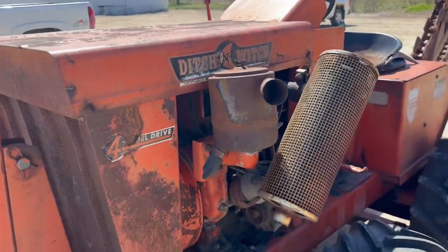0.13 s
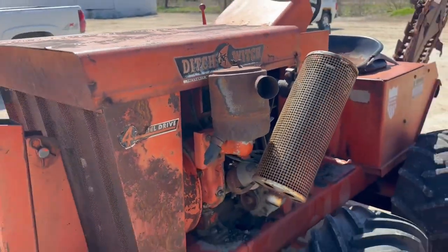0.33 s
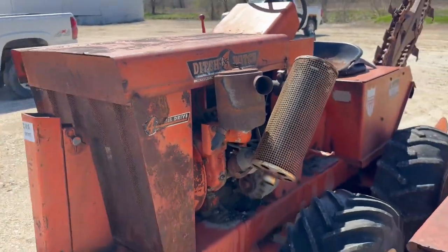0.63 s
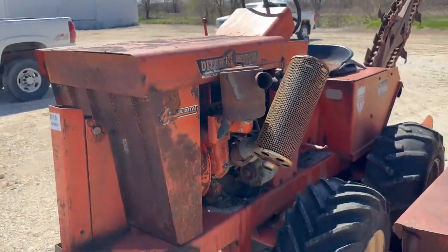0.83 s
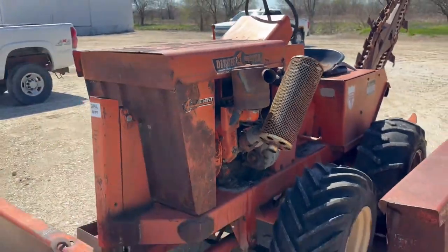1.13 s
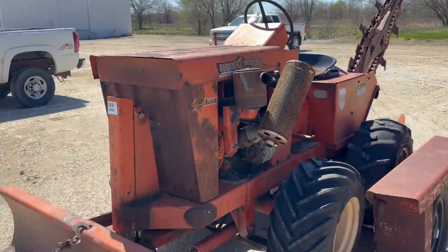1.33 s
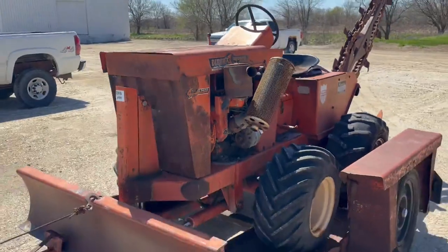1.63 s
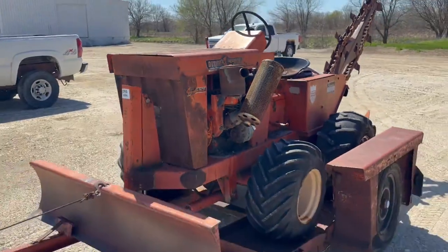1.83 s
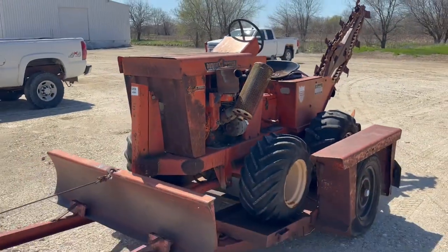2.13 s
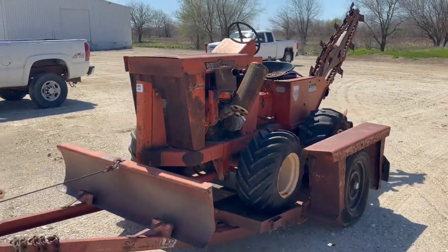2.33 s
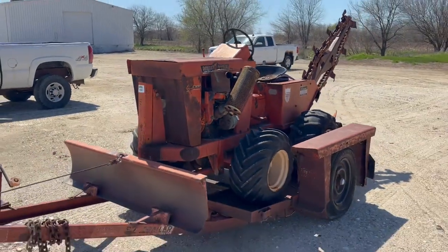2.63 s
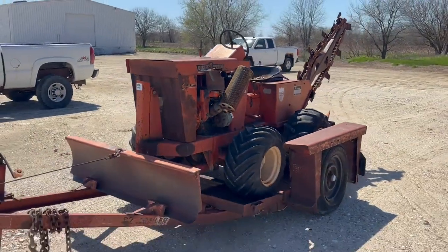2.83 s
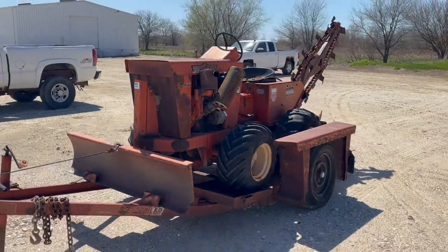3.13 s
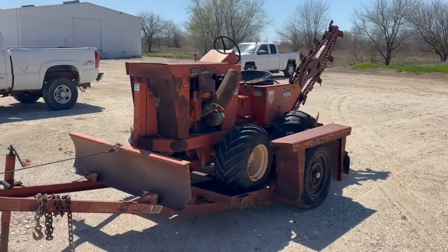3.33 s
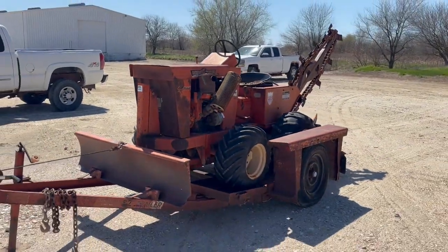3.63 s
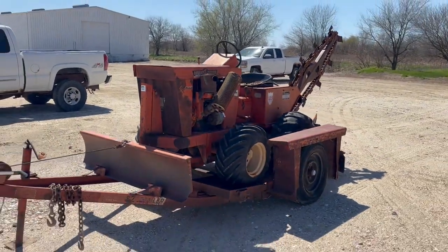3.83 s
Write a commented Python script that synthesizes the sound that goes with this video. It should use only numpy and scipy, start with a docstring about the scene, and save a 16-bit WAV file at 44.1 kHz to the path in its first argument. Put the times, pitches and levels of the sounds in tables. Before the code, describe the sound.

Small petrol engine chugging at fast even idle in an open gravel lot, gradually growing more distant

```python
"""The two-cylinder petrol engine of a trencher idles in an open gravel lot while the microphone backs away.
Each engine cycle fires two exhaust beats a quarter cycle apart, which boom and ring the muffler.
Knocks ring the block and sheet metal, the valve gear ticks, steady tones waver and the cooling fan rushes.
Filtered noise makes the air rumble, the low wind gusts and the later scuffs; decaying sines make dull bumps.
The bass falls away near the end."""
import sys
import numpy as np
from scipy import signal
from scipy.fft import rfft, irfft
from scipy.io import wavfile
from scipy.ndimage import map_coordinates

SR = 44100
rng = np.random.default_rng(int(sys.argv[2]) if len(sys.argv) > 2 else 0)


def wrap_up_sound(samples):
    """Save the sound to the file named by the first command line argument, as 16-bit audio."""
    columns = np.atleast_2d(samples).T
    # keep every value between -1 and 1, then stretch to whole-number steps
    tamed = np.clip(columns, -1, 1)
    steps = np.round(tamed * 32767).astype(np.int16)
    wavfile.write(sys.argv[1], SR, steps)


N = 176400
T = np.arange(N) / SR
HZ = np.fft.rfftfreq(N, 1 / SR)


def amp(db):
    """Decibels to gain."""
    return 10 ** (np.asarray(db) / 20)


def unit(x):
    """Scales to rms 1."""
    return x / np.sqrt(np.mean(x ** 2) + 1e-20)


def read(points, hz=HZ):
    """Reads a table on a log-frequency axis."""
    f, value = np.transpose(points)
    return np.interp(np.log(hz + 1), np.log(f + 1), value)


def curve(table, order=1):
    """Reads one column of a table over time."""
    rows = np.array(table)
    return np.interp(T, rows[:, 0], rows[:, order])


def colour(x, db):
    """Causal minimum-phase filter with the given gain per frequency, found by folding the cepstrum."""
    fold = irfft(np.maximum(db, -100) * np.log(10) / 20, N)
    fold[1:N // 2] *= 2
    fold[N // 2 + 1:] = 0
    response = irfft(np.exp(rfft(fold)), N)[:SR // 8]
    return signal.fftconvolve(x, response)[:N]


def drift(hz):
    """Random wander of rms 1, smoothed above the given frequency."""
    return unit(irfft(rfft(rng.standard_normal(N)) * np.exp(-(HZ / hz) ** 2), N))


# Engine speed. Each row: time in seconds, four-stroke cycles per second.
SPEED = [(0, 16.55), (.6, 16.48), (1.4, 16.44), (1.8, 16.447), (2.6, 16.51), (3, 16.515), (4, 16.49)]


def turns():
    """Engine cycles completed: the running sum of the speed."""
    start_cycles = -.011
    return start_cycles + np.cumsum(curve(SPEED)) / SR


def strikes(place, spread_db, jitter_s):
    """One impulse per cycle at the given place, uneven in strength and time."""
    turn = turns()
    cycles = np.arange(int(turn[-1] - place) + 1) + place
    when = np.interp(cycles, turn, T)
    late, strong = rng.standard_normal((2, len(when)))
    index = np.round((when + jitter_s * late) * SR).astype(int)
    out = np.zeros(N)
    out[np.clip(index, 0, N - 1)] = amp(spread_db * np.clip(strong, -2, 2))
    return out


# Loudness as the microphone backs away; the clatter level also drives the fan's rush and the tones.
# Each row: time in seconds, clatter in dB, hiss in dB, ticks in dB, before each layer's own trim.
RETREAT = [(0, -23, -29, -44), (.3, -24.5, -33, -36), (.92, -27.5, -33.5, -36), (1.5, -28.5, -37, -41),
           (2.1, -31, -39, -41), (2.63, -32.5, -42, -44.5), (3.1, -33, -41.5, -42.5), (4, -35.5, -39, -42)]


def retreat_db(order=1):
    """Level in dB of one part of the engine as the distance grows."""
    return curve(RETREAT, order)


# Ringing of the engine's fins and covers. Each row: pitch in Hz, width in Hz, boost in dB.
FINS = [(1493, 21, 4), (1920, 13, 6.5), (3800, 32, 2.5), (5270, 54, 4), (6370, 110, 4.5), (8140, 92, 3.5),
        (11470, 140, 5.5), (12960, 120, 6)]


def fins():
    """Resonance peaks of the fins and covers, in dB per frequency."""
    return sum(db / (1 + (2 * (HZ - hz) / width) ** 2) for hz, width, db in FINS)


def ground(x):
    """Adds the reflection from the gravel, which catches up with the direct sound as the distance grows."""
    near_s, far_s, echo_db = .0045, .002, -14
    delay_s = near_s * (far_s / near_s) ** (T / T[-1])
    echo = map_coordinates(x, [(T - delay_s) * SR], order=3)
    return unit(x + amp(echo_db) * echo)


# Level of the air rumble at the microphone. Each row: time in seconds, level in dB.
RUMBLE_LEVEL = [(0, -14.5), (.2, -18.5), (.7, -21), (1.3, -20), (1.9, -28), (2.3, -22.5), (2.6, -21.5),
                (2.8, -27), (2.92, -32), (3.3, -32), (3.6, -34), (4, -36.5)]
# Spectrum of the air rumble. Each row: frequency in Hz, relative gain in dB.
RUMBLE = [(12, -42), (25, -34), (40, -8), (65, -2), (100, 0), (150, -3), (230, -9.5), (330, -16),
          (600, -28.5), (2000, -55)]


def rumble():
    """Lumpy low noise of air at the microphone."""
    lump_db, lump_hz = 2.06, 25.9
    noise = rng.standard_normal(N) * amp(lump_db * drift(lump_hz))
    return unit(colour(noise, read(RUMBLE))) * amp(curve(RUMBLE_LEVEL))


# Short swells of band noise: low wind gusts early, then the body of a clunk and scuffs,
# probably footsteps on gravel or handling.
# Each row: centre in seconds, length in seconds, pitch in Hz, width in octaves, level in dB.
SWELLS = [(.11, 0.09, 177, .35, -13.5), (0.188, .09, 72, .35, -17.5), (1.794, 0.033, 75, .45, -21.5),
          (2.07, .04, 78, 0.46, -23), (2.311, 0.045, 81, 0.3, -17), (3.074, 0.062, 450, .5, -27.5),
          (3.02, .08, 750, .5, -36), (3.254, 0.11, 500, 0.42, -33), (3.379, 0.023, 380, 0.63, -32),
          (3.595, 0.088, 525, 0.55, -34.5), (3.83, 0.44, 754, 0.47, -36)]


def swells():
    """Low wind gusts, then the body of a clunk and scuffs: band noise under bell-shaped windows."""
    out = np.zeros(N)
    for centre, length, hz, octaves, db in SWELLS:
        gain = np.exp(-(np.log2((HZ + 1) / hz) / octaves) ** 2 / 2)
        band = irfft(rfft(rng.standard_normal(N)) * gain, N)
        window = np.exp(-(2 * (T - centre) / length) ** 2)
        swell = band * window
        windowed_rms = np.sqrt(np.sum(swell ** 2) / np.sum(window ** 2))
        out += amp(db) * swell / windowed_rms
    return out


# Dull bumps. Each row: start in seconds, rise in seconds, pitch in Hz, envelope peak in dB.
BUMPS = [(.145, 0.0084, 94, -11), (.162, 0.02, 70.5, -11), (1.293, 0.0064, 150.5, -6.5),
         (2.587, 0.0098, 130, -9.5), (2.755, 0.009, 103, -9), (3.053, 0.009, 382, -18.5),
         (3.094, 0.0039, 330, -16.5), (3.137, 0.0055, 166, -19), (3.565, 0.0035, 332, -23)]


def bumps():
    """Each dull bump is a sine that swells quickly and dies within a few swings."""
    out = np.zeros(N)
    for start, rise, hz, db in BUMPS:
        t = np.maximum(T - start, 0)
        envelope = (t / rise * np.exp(1 - t / rise)) ** 2
        out += amp(db) * envelope * np.sin(2 * np.pi * hz * t)
    return out


# Level of the flutter in the low middle. Each row: time in seconds, level in dB.
FLUTTER_LEVEL = [(0, -27), (.7, -32.5), (1.3, -34.5), (1.8, -32.5), (2.3, -32.5), (2.6, -35), (2.85, -34),
                 (3.3, -35.5), (3.45, -43), (4, -64)]
# Spectrum of the flutter. Each row: frequency in Hz, relative gain in dB.
FLUTTER = [(120, -24), (220, 2), (290, 2.5), (380, -3.5), (550, -8), (1000, -31)]


def flutter():
    """Lumpy filtered noise just above the exhaust's ring."""
    lump_db, lump_hz = 2.8, 39.4
    noise = rng.standard_normal(N) * amp(lump_db * drift(lump_hz))
    return unit(colour(noise, read(FLUTTER))) * amp(curve(FLUTTER_LEVEL))


# Rush of the cooling fan. Each row: frequency in Hz, relative gain in dB.
FAN = [(150, -20.5), (300, -9), (450, -7.5), (610, -3), (740, -1), (830, 0), (980, -2), (1130, -1),
       (1360, -5.5), (1480, -5.5), (2160, -7), (2500, -7), (2800, -17.5), (3480, -16.5), (5520, -23),
       (8000, -26), (11000, -42)]
# Hiss of its air over the fins. Each row: frequency in Hz, relative gain in dB.
HISS = [(1500, -34.5), (2800, -2.5), (4000, -2), (5500, -9), (8000, -8.5), (10000, -16), (13000, -15.5),
        (16000, -15)]


def fan():
    """Cooling air rushes through the shroud and hisses over the fins: two bands of turbulent noise."""
    rush_db, hiss_db = -2.5, -4.5  # trims on the retreat levels
    waver_db, waver_hz = .3, 7.1
    rush_noise, hiss_noise = rng.standard_normal((2, N))
    rush = ground(colour(rush_noise, read(FAN) + fins()))
    hiss = unit(colour(hiss_noise, read(HISS) + fins()))
    hiss_level = hiss_db + retreat_db(order=2) + waver_db * drift(waver_hz)
    return rush * amp(rush_db + retreat_db()) + hiss * amp(hiss_level)


# Steady gear and fan tones. Each row: multiple of the cycle rate, level in dB relative to the clatter.
TONES = [(30, -16.5), (34, -18), (41, -22.5), (49, -18.5), (70, -23.5)]


def tones():
    """Sines that follow the crankshaft, wavering in strength and phase."""
    waver, wander_turns = .6, .14  # rms: share of the strength, turns of phase
    turn = turns()
    lines = np.zeros(N)
    for multiple, db in TONES:
        strength = amp(db) * (1 + waver * drift(hz=1.7))
        phase = round(multiple) * turn + rng.random() + wander_turns * drift(hz=4.4)
        lines += strength * np.sin(2 * np.pi * phase)
    return np.sqrt(2) * lines * amp(retreat_db())


# Ticks of the valve gear. Each row: place in the cycle 0-1, t60 in seconds, brightness in dB per octave,
# then relative level in dB near, midway and far.
TICKS = [(.15, .04, -3.5, 0, 1, -5), (.325, 0.06, 0.5, 2.5, 4, 2.5), (.41, 0.045, -1, 1, 0.5, -6),
         (.63, 0.037, 7.5, -13, -4, -6), (.875, 0.038, 4, 8, -14, -6)]
# Spectrum shared by the ticks. Each row: frequency in Hz, relative gain in dB.
TICK_COLOUR = [(800, -30), (2500, 5.5), (4000, -2), (6500, 4), (9000, -4.5), (13000, -5.5), (16000, -6.5)]


def ticks():
    """Short gritty noise bursts from the valve gear; each part faces the microphone at another stage."""
    spread_db, jitter_s = 1.8, .0007
    rise_s, pivot_hz, grain_db, trim_db = .0003, 7000, 3.2, -4.5
    t, out = T[:SR // 8], np.zeros(N)
    for place, t60, tilt_db, *heard_db in TICKS:
        shape = amp(-60 * t / t60) * (1 - np.exp(-t / rise_s))
        # overlapping bursts add in power
        power = signal.oaconvolve(strikes(place, spread_db, jitter_s) ** 2, shape ** 2)[:N]
        grain = amp(np.tanh(drift(hz=700)) * grain_db)
        rattle = np.sqrt(abs(power)) * grain * rng.standard_normal(N)
        facing = amp(np.interp(T, np.linspace(0, T[-1], len(heard_db)), heard_db))
        tilt = tilt_db * np.log2((HZ + 1) / pivot_hz)
        out += colour(rattle * facing, read(TICK_COLOUR) + fins() + tilt)
    return unit(out) * amp(trim_db + retreat_db(order=3))


# Knocks of pistons and gears. Each row: place in the cycle 0-1, relative level in dB, t60 in seconds.
KNOCKS = [(.12, 0, 0.13), (.25, -3, 0.1), (.42, -5, 0.1), (.63, -3, 0.068), (.71, -4, 0.067),
          (.94, -2, 0.15)]
# Ring of the block and sheet metal. Each row: frequency in Hz, relative gain in dB.
BODY = [(200, -29), (380, -4.5), (490, -4), (600, -10), (690, -3), (800, -4), (990, -4.5), (1120, -0.5),
        (1370, -6.5), (1480, -5), (1700, -6), (2200, -9), (2500, -15.5), (2800, -17), (5000, -19),
        (7000, -44.5)]


def knocks(positions=9):
    """Each knock rings the metal much alike from cycle to cycle, changing slowly with the listening position."""
    spread_db, jitter_s, trim_db = 2, .00009, -2
    t, out = T[:SR // 8], np.zeros(N)
    path = T / T[-1] * (positions - 1)
    for place, db, t60 in KNOCKS:
        hits = amp(db) * strikes(place, spread_db, jitter_s)
        for k in range(positions):
            near = np.cos(np.pi / 2 * np.clip(path - k, -1, 1))  # crossfade between positions
            ring = unit(rng.standard_normal(len(t)) * amp(-60 * t / t60))
            out += signal.oaconvolve(hits * near, ring)[:N]
    return ground(colour(out, read(BODY) + fins())) * amp(trim_db + retreat_db())


# Exhaust beats. Each row: place in the cycle 0-1, relative level in dB.
FIRINGS = [(0.385, 3.5), (0.63, 4)]
# Ring of the muffler. Each row: frequency in Hz, relative gain in dB.
MUFFLER = [(40, -35.5), (100, -13.5), (128, -1.5), (150, 2), (175, 0.5), (203, 0.5), (230, -5.5),
           (270, -13.5), (340, -25), (600, -37.5), (1500, -61)]
# Deep boom of the exhaust. Each row: frequency in Hz, relative gain in dB.
BOOM = [(20, -56), (45, -18.5), (80, 7.5), (105, -7.5), (135, -3.5), (180, -18), (280, -19), (600, -50)]
# Level of the exhaust at the microphone. Each row: time in seconds, deep boom in dB, muffler ring in dB.
BASS = [(0, -34, -15.5), (.25, -21, -17.5), (.6, -29, -18.5), (1.2, -28.5, -23), (1.8, -24, -28.5),
        (2.84, -28.5, -30), (2.95, -41, -41), (4, -40, -45.5)]


def exhaust():
    """Two beats per cycle boom from the pipe and ring the muffler; the ring fades sooner with distance."""
    spread_db, jitter_s = 1.4, .0006
    beats = sum(amp(db) * strikes(place, spread_db, jitter_s) for place, db in FIRINGS)
    ring = unit(colour(beats, read(MUFFLER))) * amp(curve(BASS, order=2))
    boom = unit(colour(beats, read(BOOM))) * amp(curve(BASS))
    return ring - boom


# The two microphone ports. Each row: frequency in Hz, likeness of the two sides (clipped to 0-1 in use).
LIKENESS = [(60, 0.9), (150, 0.5), (300, 0.92), (600, 0.73), (1100, .87), (1900, 0.73), (2800, 0.67),
            (4000, 0.87), (5400, 0.77), (7200, 1), (8700, 1.2), (10000, 1.4), (11200, 0), (12800, 1.1),
            (14200, .68), (15500, 3)]
# Phase between the ports. Each row: frequency in Hz, radians by which the left leads.
LEAD = [(0, 0), (1200, .15), (2200, .45), (2750, 1.2), (3300, .35), (4500, .1), (5400, -.65), (6300, 0),
        (7500, 0), (9900, -3.14), (10500, -3.3), (12300, -6.2), (13200, -6.35), (15500, -9.4)]
# Balance of the ports. Each row: frequency in Hz, left minus right in dB.
BALANCE_DB = [(250, 0), (700, -2), (1200, -3), (2000, -3), (2500, -1), (3000, 5.5), (4300, 0.5),
              (5600, 3.5), (7000, -0.5)]


def scene():
    """The shared sound and an unrelated part reach the two ports with their own phase and balance."""
    shared, apart = (rfft(knocks() + ticks() + fan() + flutter() + rumble() + swells()) for _ in range(2))
    central = rfft(exhaust() + tones() + bumps())  # alike at both ports before phase and balance
    same = np.clip(read(LIKENESS), 0, 1)
    side = np.array([[1], [-1]])  # left, right
    both = central + np.sqrt((1 + same) / 2) * shared + side * np.sqrt((1 - same) / 2) * apart
    balance = amp(side * read(BALANCE_DB) / 2)
    phase = np.exp(.5j * side * read(LEAD))
    return irfft(both * balance * phase, N)


def record(dry):
    """The highest peaks are rounded off, then the band is limited at the recorder's cut-off."""
    knee, ceiling, edge_hz = .6, .92, 15700  # knee and ceiling as shares of full scale
    room = ceiling - knee
    over = np.maximum(abs(dry) - knee, 0)
    limited = dry - np.sign(dry) * (over - room * np.tanh(over / room))
    lowpass = signal.firwin(511, edge_hz, window=("kaiser", 9), fs=SR)
    return signal.oaconvolve(limited, lowpass[None], "same")


dry = scene()
out = record(dry)
wrap_up_sound(out)
```